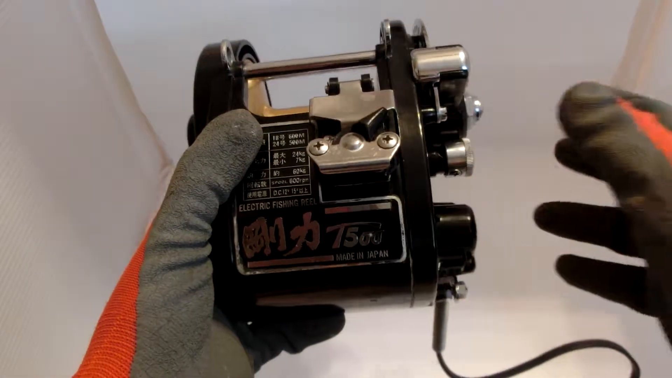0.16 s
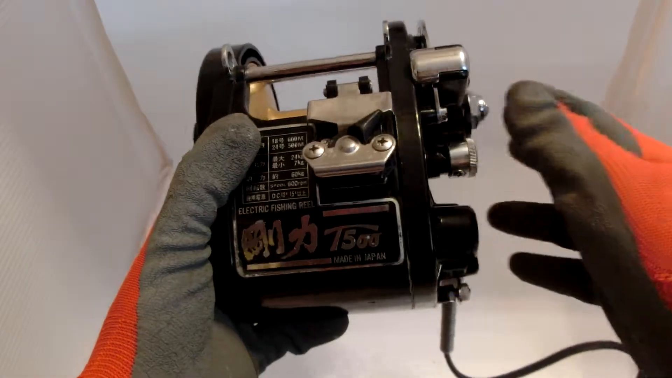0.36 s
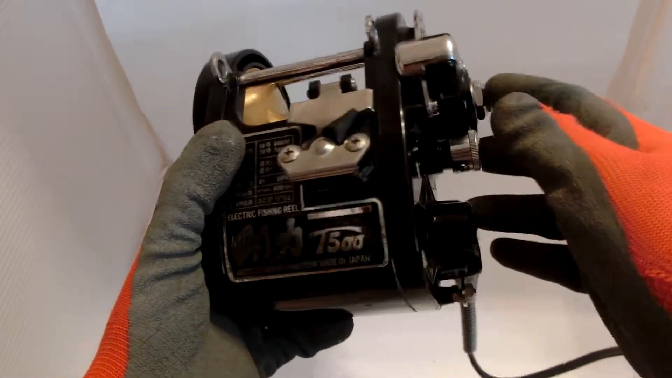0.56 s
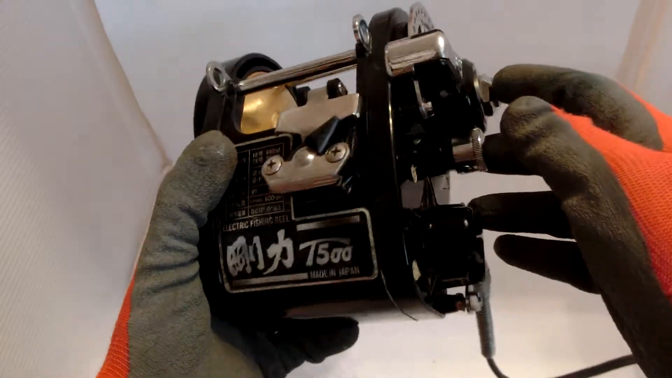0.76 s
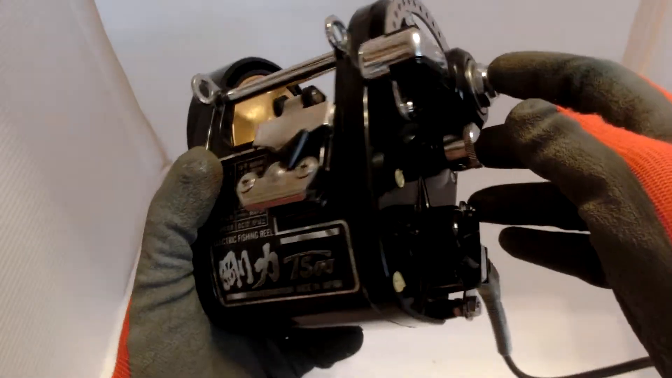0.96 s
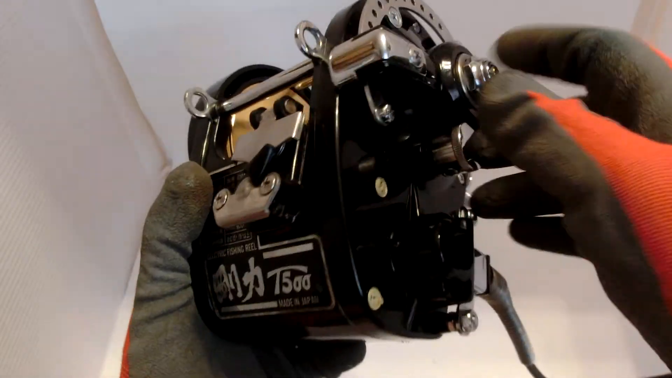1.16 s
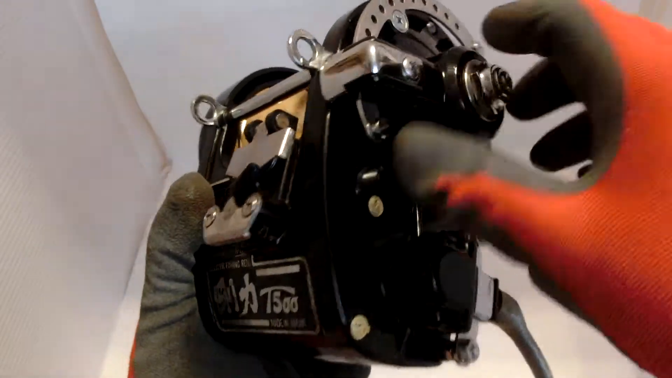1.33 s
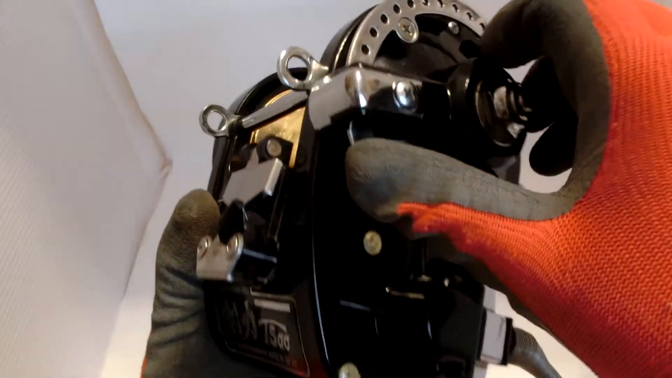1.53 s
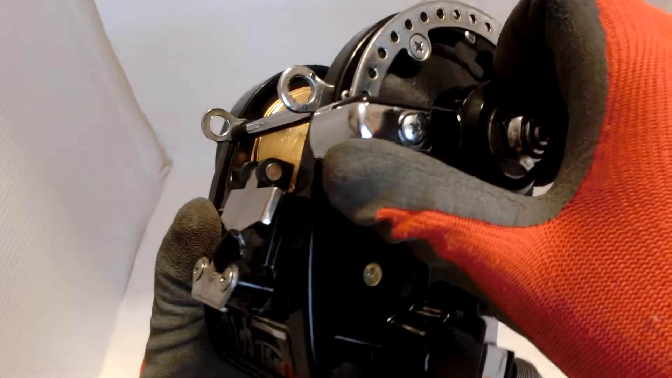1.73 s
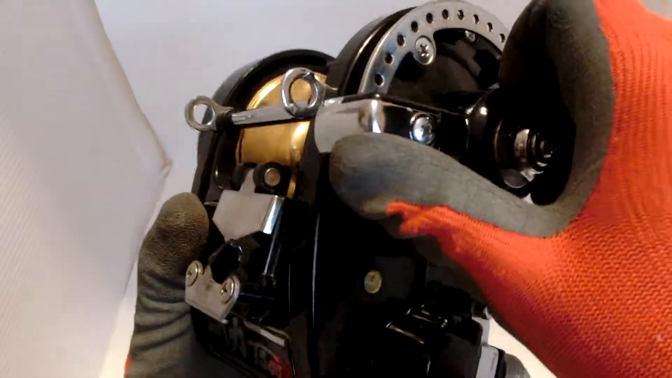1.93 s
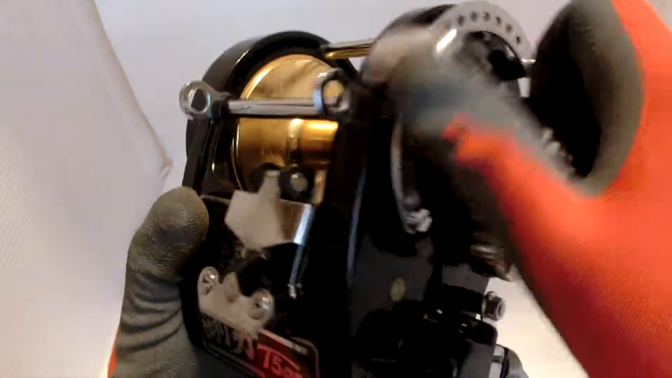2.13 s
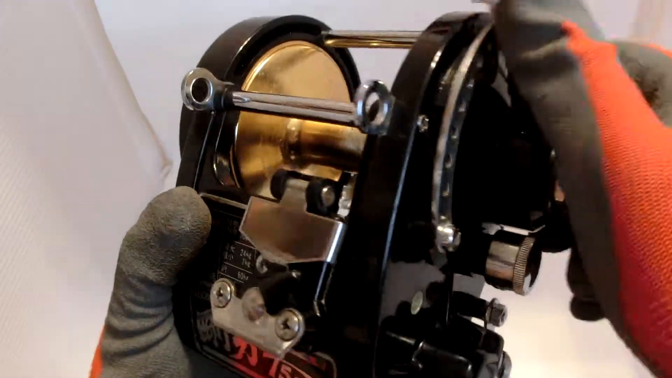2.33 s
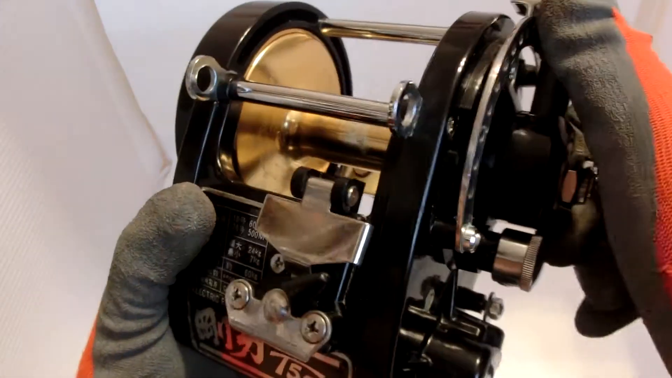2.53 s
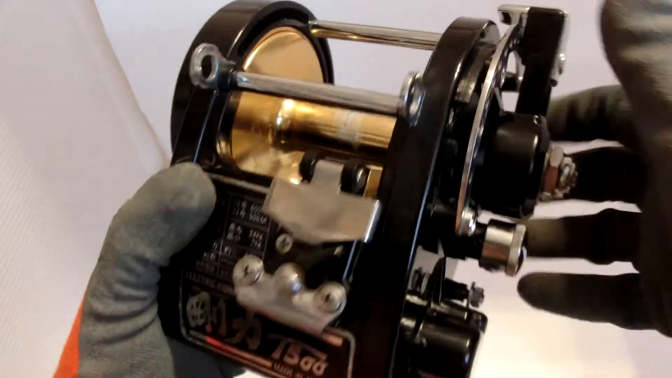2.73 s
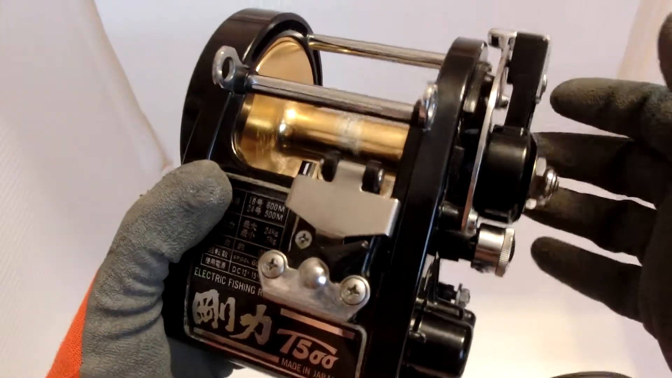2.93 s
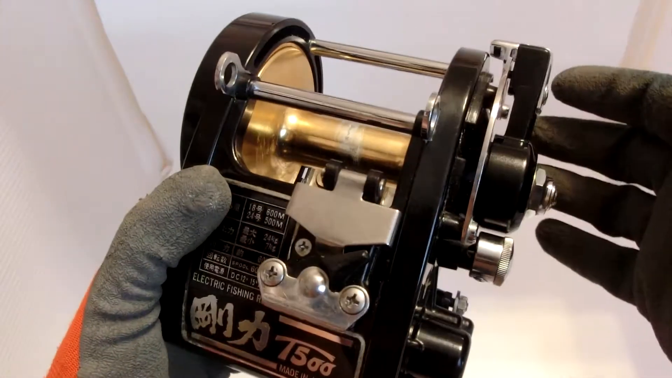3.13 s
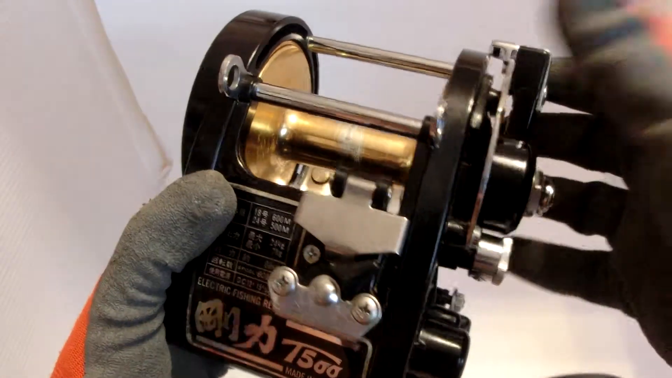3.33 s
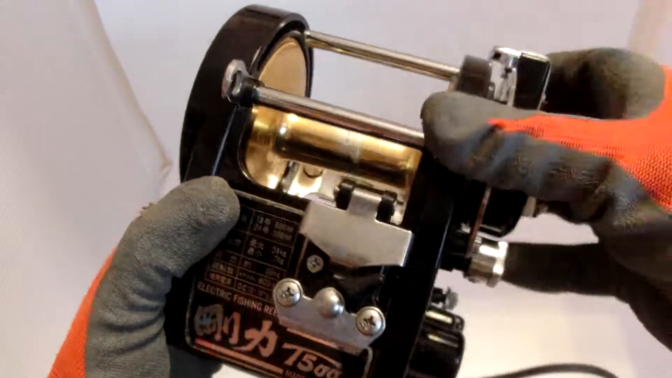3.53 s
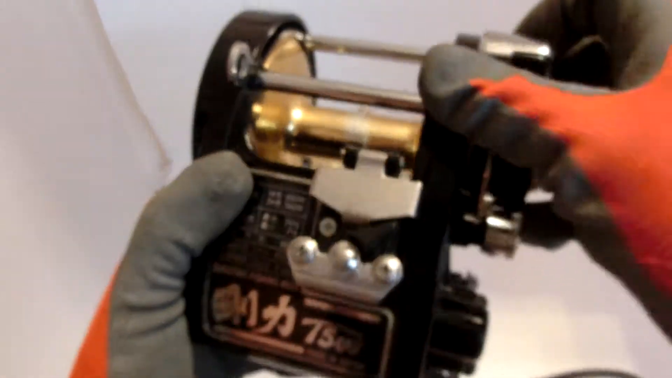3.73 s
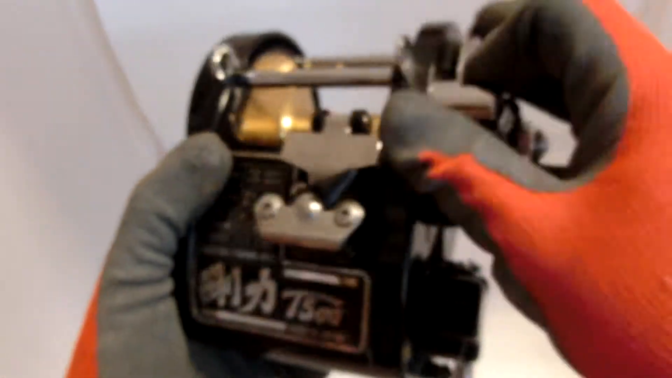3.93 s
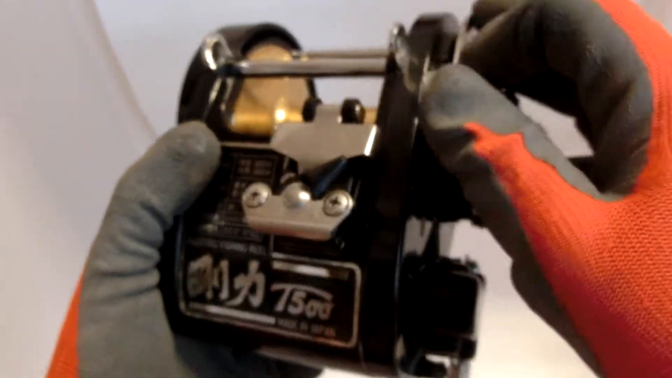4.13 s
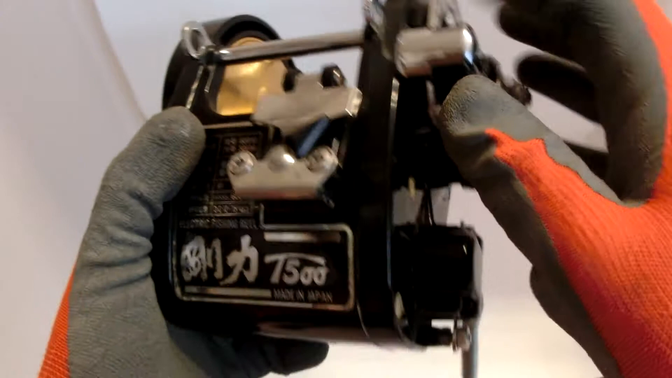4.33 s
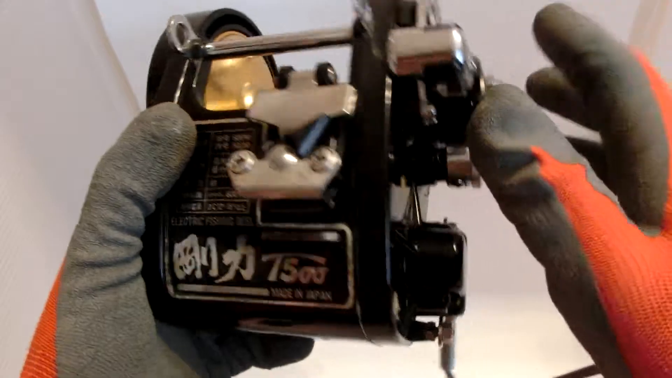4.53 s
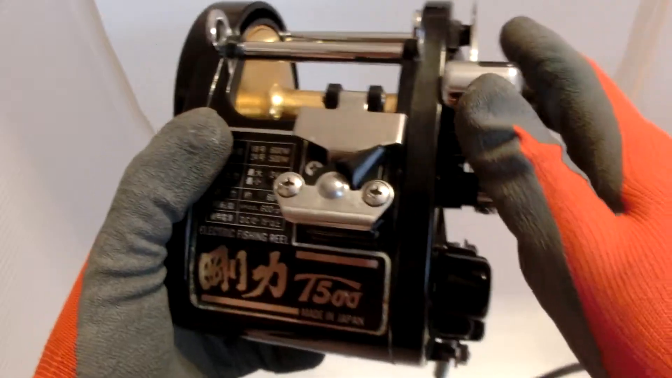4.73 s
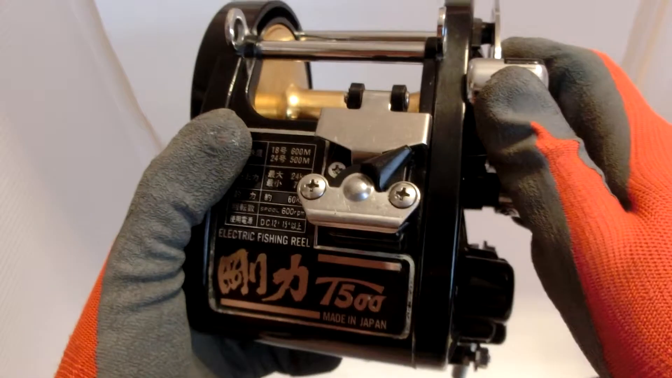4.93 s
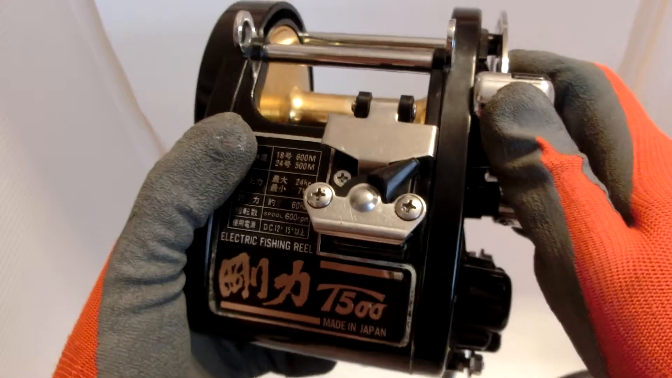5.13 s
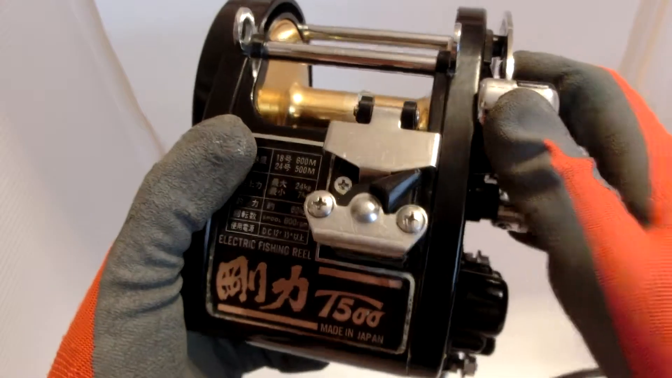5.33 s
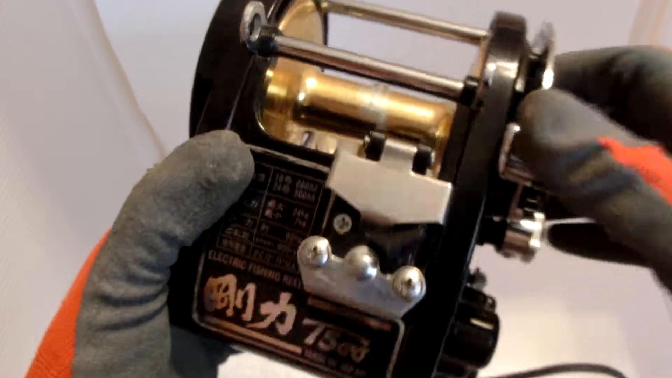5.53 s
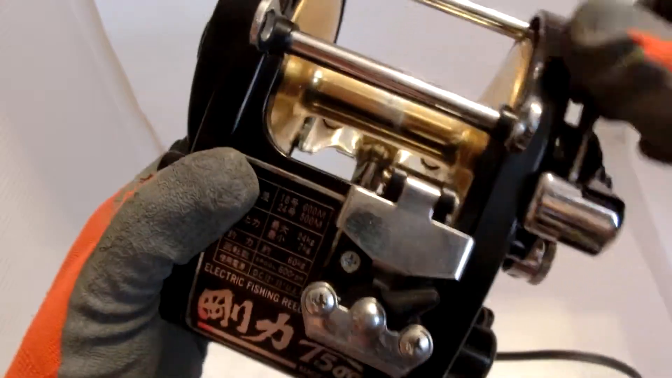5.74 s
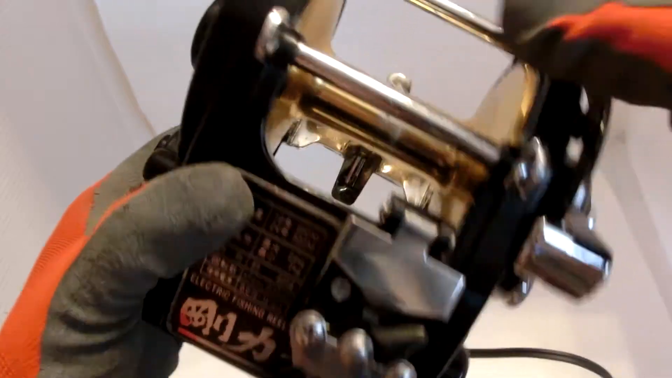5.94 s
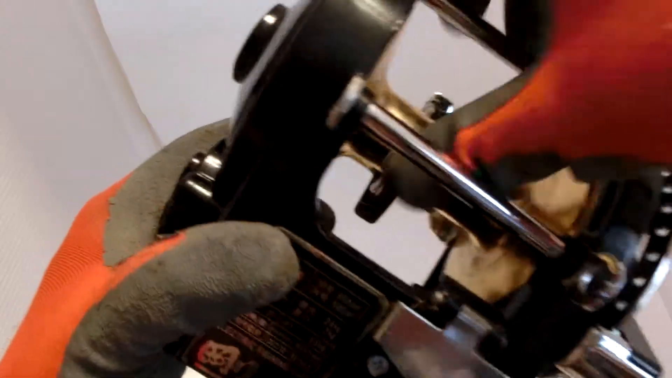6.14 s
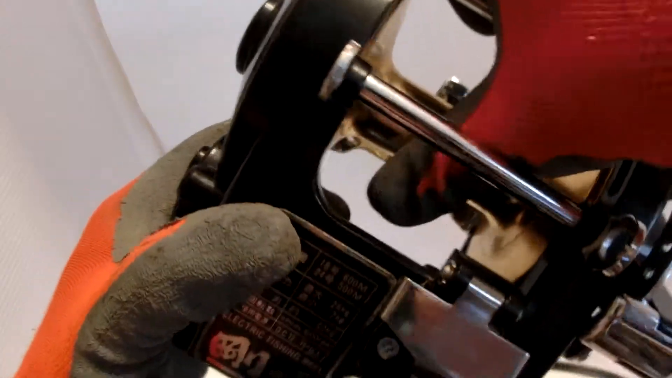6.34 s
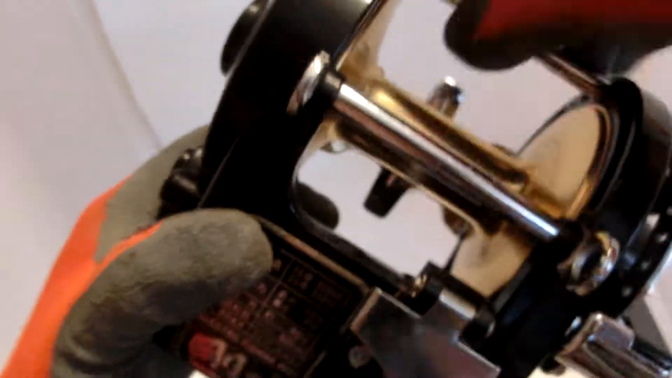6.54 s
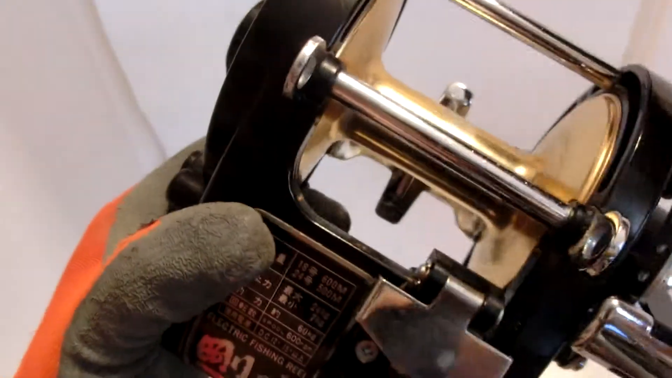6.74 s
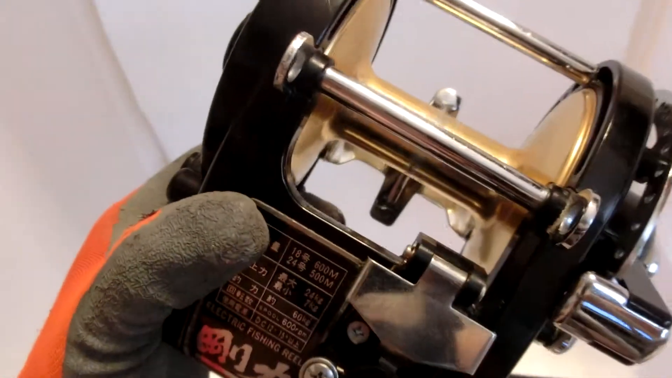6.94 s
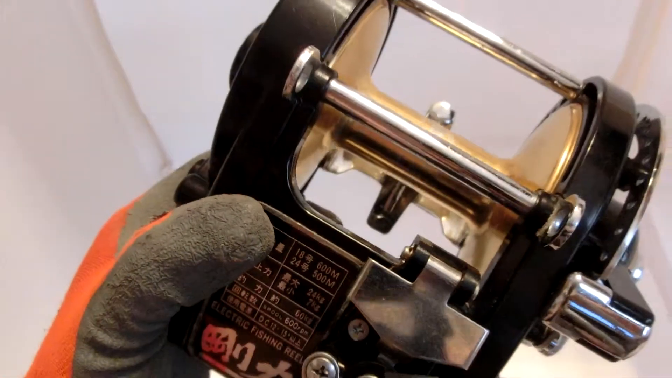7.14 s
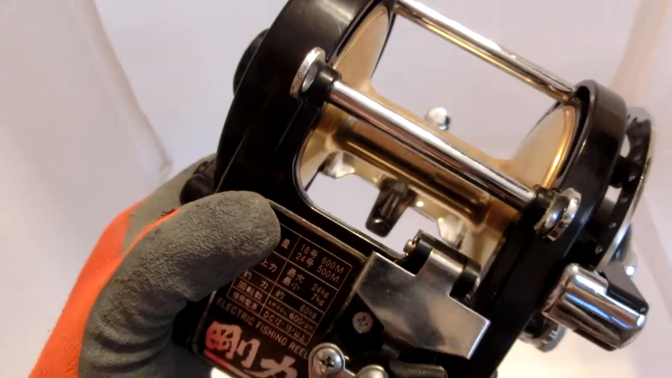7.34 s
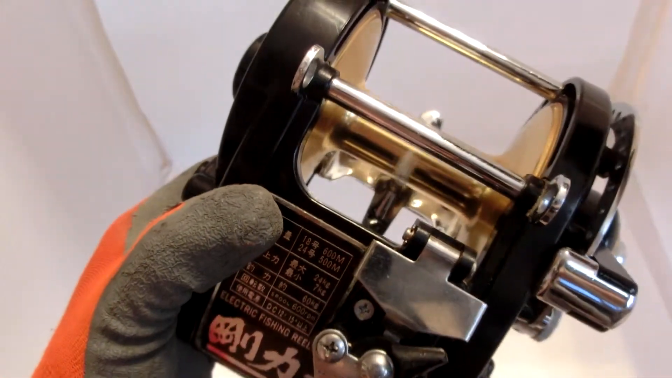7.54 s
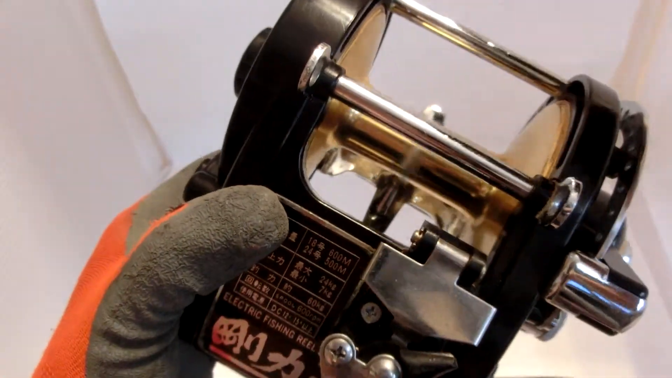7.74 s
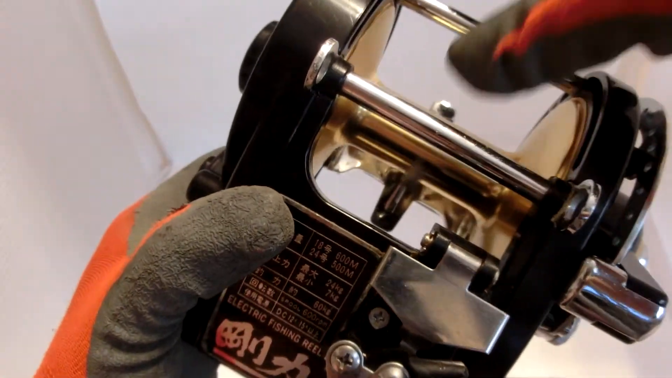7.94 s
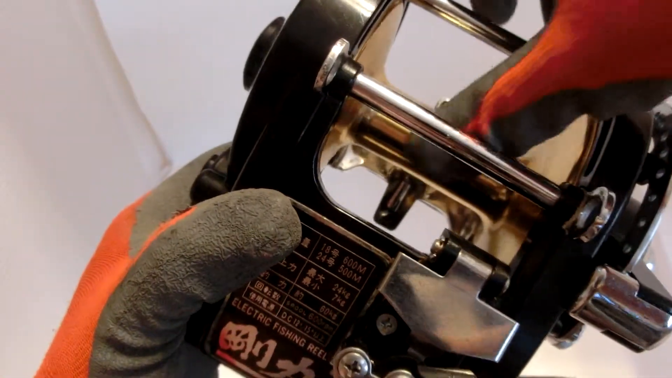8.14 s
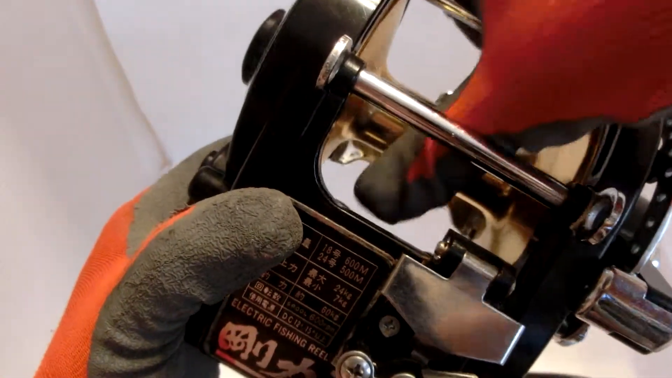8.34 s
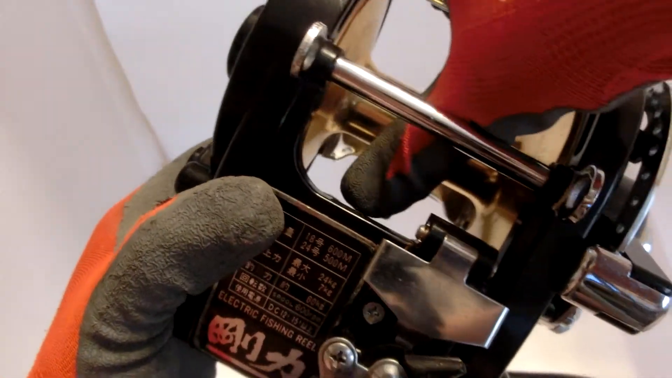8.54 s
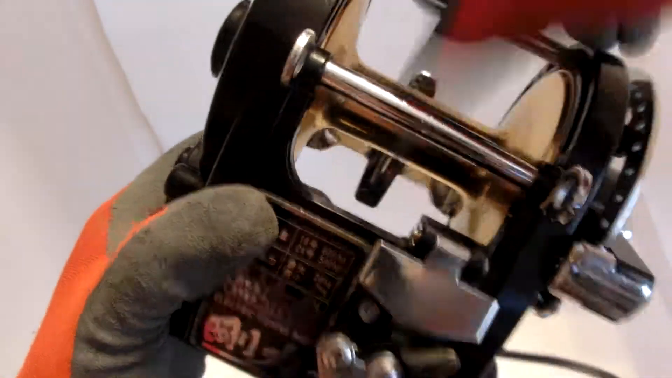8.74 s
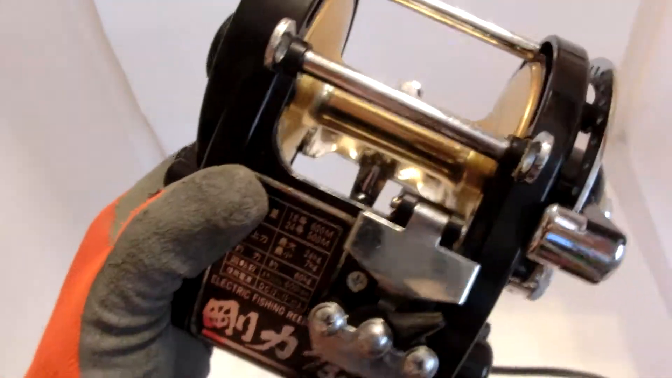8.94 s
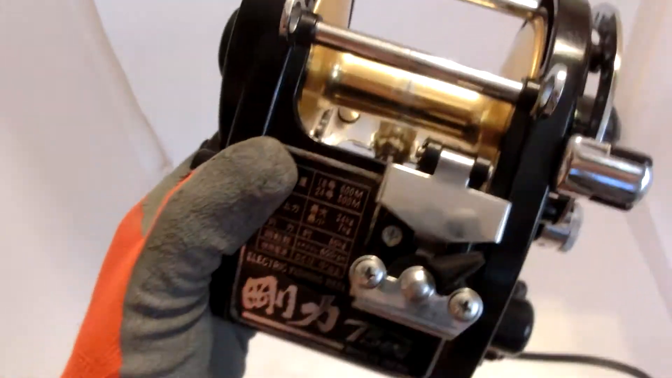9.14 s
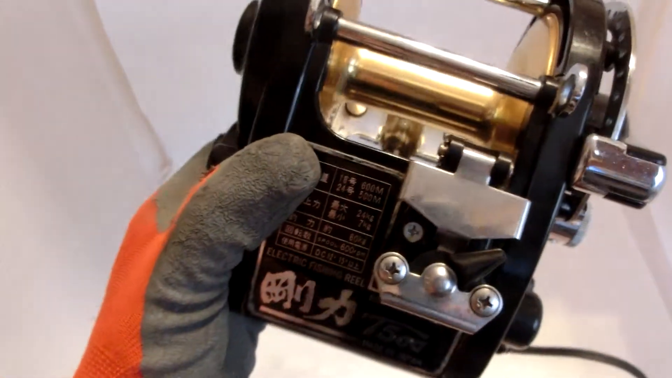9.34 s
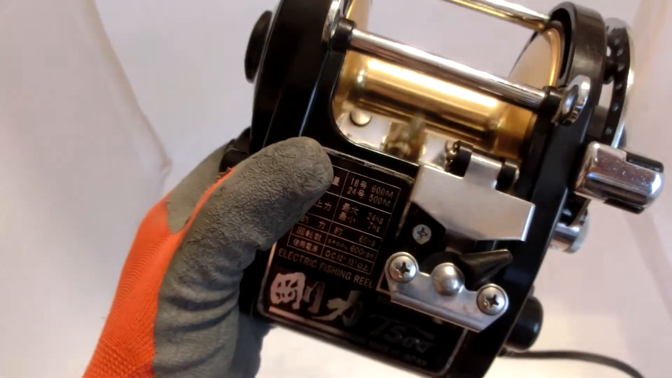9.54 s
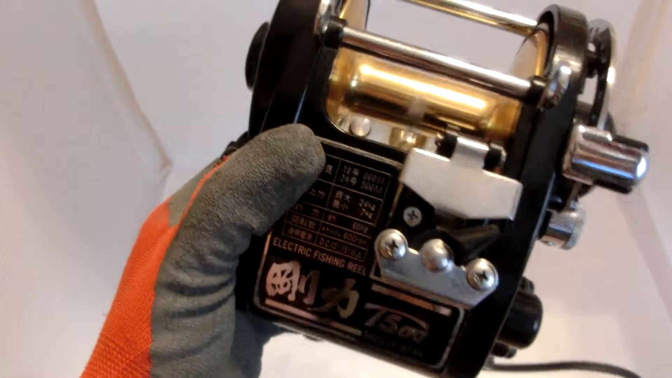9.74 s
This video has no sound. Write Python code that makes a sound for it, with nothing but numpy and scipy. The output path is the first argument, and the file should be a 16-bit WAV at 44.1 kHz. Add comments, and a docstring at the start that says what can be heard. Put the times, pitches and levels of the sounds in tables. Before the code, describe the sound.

Quiet indoor murmur and soft glove handling lead to a rapid metallic ratcheting, a pause, then another uneven burst with harder knocks. Later come small finger taps and a sharp snap with a low jolt, releasing a grainy, pulsing bearing whirr. It gradually slows, is braked amid taps, then a second snap restarts it. Close stereo pickup, short room reflections, gain dipping after loud clicks.

```python
"""A metal fishing reel in gloved hands close to a camera: its drag lever crosses the notches of a steel arc,
forward and back, each notch a bright tick and a duller knock that ring the side plate. Then a finger flicks
the free spool twice and it coasts on its ball bearings: noise through resonances, throbbing as it turns.
Gloves rub and tap as shaped noise, a far clock ticks through the small room's noise tails over murmur and
hiss, and the camera turns its gain down after loud clicks."""
import sys
import numpy as np
from scipy import signal
from scipy.fft import rfft, irfft, next_fast_len
from scipy.io import wavfile
from scipy.ndimage import uniform_filter1d, map_coordinates

SR = 44100
rng = np.random.default_rng(int(sys.argv[2]) if len(sys.argv) > 2 else 0)


def transcribe(u):
    """Save the signal u as a 16-bit wav file named by the first command-line argument.

    u: samples, shape (n,) or (channels, n), limited to [-1, 1]; the rate is SR.
    q: integer samples, one column per channel.
    """
    v = np.clip(np.atleast_2d(u).T, -1, 1)
    q = np.round(v * 32767).astype(np.int16)
    wavfile.write(sys.argv[1], SR, q)


def field_ratio(decibels):
    """Amplitude ratio for a level in dB (20 dB per decade); scalars and array-likes work."""
    return 10 ** (np.asarray(decibels, dtype=float) / 20)


N = 431298
TIME = np.arange(N) / SR

# Lever notches. Each row: tick time in seconds, plunger tick level in dB, wait for the seating knock in ms
# (from LEAD samples before the tick), knock level in dB, knock pitch in Hz.
NOTCHES = [(1.8672, -9.5, 2.5, -29.5, 1670), (2.05, -9, 4, -16, 2005), (2.0754, -11, 3.4, -20, 2040),
           (2.134, -7.5, 2.56, -21, 2500), (2.1696, -8, 2.9, -22.5, 5000), (2.2125, -11, 2.76, -10.5, 4100),
           (2.2523, -9.5, 3.9, -20.5, 2500), (2.3146, -11.5, 3.7, -22.5, 2400),
           (2.3700, -13.5, 1.15, -14, 5500), (2.4280, -18.5, 1.5, -32.5, 2800),
           (3.602, -13.5, 1.66, -6.5, 5000), (3.6142, -10.5, 1.44, -4.5, 3993), (3.632, -15, 1.8, -7, 2700),
           (3.6484, -12, 1.94, -4.5, 2500), (3.673, -15, 3.9, -14.5, 2500), (3.767, -19, 3.2, -6, 4020),
           (3.8014, -13.5, 3.1, -3.5, 4250), (3.8356, -12, 4, -5.5, 4130), (3.8810, -15.5, 2.9, -1, 4000)]
LEAD = 32  # samples
# Lever place along the arc. Each row: time in seconds, mean lag of the left port in microseconds.
LEVER_LAG_US = [(1.87, 28), (2.05, 21), (2.43, 13), (3.6, 13.5), (3.68, 25), (3.77, 27), (3.88, 22)]
# Modes of the side plate. Each row: frequency in Hz, relative level in dB, t60 in seconds.
PLATE_MODES = [(1010, -15.5, 0.2), (1654, -7, 0.087), (2200, -13.5, .1), (2515, -4, 0.12), (2976, -8, 0.1),
               (4200, -6.5, 0.17), (5000, -11.5, 0.082), (5500, -13, .12), (7760, -9.5, .12),
               (8680, -4.5, 0.14), (11260, -22.5, 0.13), (13920, -10.5, .1)]
# Colour of the plunger tick. Each row: frequency in Hz, relative level in dB per Hz.
TICK_COLOUR = [(880, -42), (1500, -15), (3320, -14.5), (6210, -5.5), (8570, 1), (9570, -0.5), (11500, -6.5),
               (13900, 2.5), (15200, -3.5), (16600, -29)]
# Broad resonances of the hollow body in every seating knock. Each row: frequency in Hz, relative level
# in dB per Hz.
BODY_COLOUR = [(100, -13.5), (400, -12.5), (1000, 3.5), (1700, 2), (2500, -0.5), (3400, -3), (4300, -0.5),
               (5300, 0.5), (6600, -6), (8600, 4.5), (11500, -4), (14000, -2.5), (16500, -19.5)]
TICK_T60_S, JOLT_UNDER_TICK_DB = 0.019, 27.5
STRIKE = 2.5  # single first impact of a contact over the rms of its chatter

# Spool releases. Each row: time in seconds, speed in turns/s, spool angle in turns, snap level in dB,
# lowest jolt pitch in Hz.
FLICKS = [(6.484, 8.58, 0.28, -14, 77), (8.712, 8.48, .596, -13.5, 63)]
# Spool and frame resonances. Each row: frequency in Hz, width in Hz (before widening 1.5 times), relative
# level in dB, then load in dB per unit of the once-a-turn throb, the twice-a-turn kick and the flutter.
SPOOL_MODES = [(438, 60, -10, 4.5, -4.5, 6), (741, 190, -7, 4, -0.5, 2), (1032, 163, -10, 5.5, 0.5, 5),
               (1596, 113, -5, 3, 1, 0.5), (2437, 49, -18, 1.5, -2, -17), (2653, 130, -10, 3, 4.5, 4.5),
               (3046, 300, -16.5, -4.5, 8, 7.5), (3168, 68, -6, 5.5, -0.5, 5.5),
               (3267, 50, -6.5, -4, 0.5, 4), (4250, 74, -8.5, -0.5, 1.5, 3.5),
               (4580, 120, -18, 5.5, -2, 7.5), (5930, 290, -10, -1.3, 7, 5.5), (7050, 45, -5.5, 1, 12, 0.5),
               (7418, 117, 1.5, -1, 4.5, 4), (10560, 100, -8, -5.5, -0.5, 6),
               (13870, 180, -4, -1, 3.5, 0.5)]
# Colour of the rolling hiss. Each row: frequency in Hz, relative level in dB per Hz.
ROLL_COLOUR = [(290, -34), (500, -8.5), (1100, -3), (2100, -11), (3160, -8.5), (6010, -4), (6560, -14.5),
               (7270, 3), (8540, -10), (11000, -7), (12500, -23), (14500, -11), (15800, -32),
               (16300, -60.5)]
SPOOL_LAG_US = 23  # left port lags, for spool and hands
PUSH_S, UP_TO_SPEED_S = 0.08, 0.077  # push starts before release; time to full speed
SLOWS_TURNS_PER_S2 = 3.025  # bearing drag
BRAKE_AT_S, BRAKE_S = 8.36, 0.077  # a finger stops the first run
WHIRR_DB, WHIRR_DB_PER_DECADE, REFERENCE_TURNS_PER_S = -46, 16.5, 8.1  # level at reference speed, slope

# Contacts of one flick. Each row: delay in ms, level over the snap in dB, pitch in Hz, t60 in seconds.
SNAP_CONTACTS = [(0, -1.5, 3490, .014), (2, -8.5, 896, 0.059), (10, -14.5, 1000, 0.034)]
# Shake of the held reel. Each row: delay in ms, level over the snap in dB, multiple of the lowest jolt
# pitch, t60 in seconds.
JOLT_MODES = [(-8, -12, 1, 0.091), (-3, -18, 2.47, 0.068), (-0.5, -19, 4.35, 0.054), (1, -21, 7.5, 0.039)]
# Small taps of fingers and fittings. Each row: time in seconds, level in dB, pitch in Hz, t60 in seconds.
TAPS = [(.06, -52, 798, 0.046), (.073, -43.5, 1060, .05), (.672, -58.5, 3500, .03),
        (1.7504, -43, 1000, .06), (2.471, -33.5, 2812, .019), (3.518, -49, 1474, .06),
        (4.63, -44.5, 2796, 0.12), (5.805, -50, 2200, 0.068), (6.466, -31, 4490, .012),
        (6.4747, -26, 3485, .018), (6.478, -26.5, 2700, .02), (6.579, -27, 3998, .011),
        (8.22, -36, 4100, 0.012), (8.248, -41.5, 4000, 0.012), (8.335, -44, 10000, .012),
        (8.351, -36.5, 3780, .025), (8.3845, -31.5, 3990, 0.011), (8.422, -36.5, 4195, 0.0115),
        (8.565, -50.5, 3494, .015), (8.686, -43, 870, 0.11), (8.698, -31.5, 2817, 0.061),
        (8.708, -30, 1098, .05), (8.724, -27.5, 1910, .03), (8.738, -37, 1000, .033),
        (9.291, -36, 7200, 0.018)]
BROAD_DB = -15.5  # broad clack under every tap
OVERTONE, OVERTONE_DB = 2.7, -8.5  # brighter band of every tap: multiple of its pitch, level
# Single-pitched pings of loose fittings. Each row: time in seconds, level in dB, pitch in Hz, t60 in seconds.
PINGS = [(1.208, -53, 11960, .03), (4.25, -46.5, 2630, .04), (4.545, -51.5, 938, 0.093),
         (5.138, -52, 11520, .025), (6.228, -57, 2700, .03), (7.188, -54, 12160, .024)]
PING_WIDTH = .2  # band width over pitch
# Strokes of the rubber glove. Each row: start in seconds, length in seconds, level in dB, pitch in Hz.
STROKES = [(1.099, 0.1, -63, 4490), (1.575, .08, -60, 7070), (2.023, .02, -37, 2200),
           (2.033, .03, -42, 8040), (2.613, 0.1, -53, 3910), (3.369, 0.1, -63, 4000),
           (3.57, .03, -38.5, 2200), (4.206, 0.11, -61, 2810), (5.53, .1, -62, 2500),
           (6.228, 0.09, -56.5, 5950), (6.359, 0.21, -47, 5000), (6.561, .035, -45, 3994),
           (8.297, .14, -58.5, 8090), (8.462, .1, -61, 5990), (8.584, 0.15, -44.5, 8470),
           (8.655, 0.11, -46.5, 4020)]

# Near sounds at the two ports. Each row: frequency in Hz, left over right in dB.
LEFT_OVER_RIGHT_DB = [(60, 0.5), (300, 4), (1650, 0.4), (6000, 0.8), (10000, 1.5), (15000, -1.5)]
# Room tail. Each row: frequency in Hz, t60 in seconds, nearest surfaces over the tail in dB,
# left-right likeness from 0 to 1.
ROOM_BANDS = [(300, 0.13, 3.5, 0.61), (1000, 0.31, 16, 1), (2500, 0.45, 4, 0.97), (4300, 0.3, 4.5, 0.75),
              (6500, 0.3, 4.5, .3), (9000, 0.29, 5.5, .1), (15120, 0.16, 8, .05)]
# Clock. The row: first tick in seconds, period in seconds.
CLOCK_TIMES_S = (.893, .9975)
CLOCK_DB = -54
# Colour of room and camera noise. Each row: frequency in Hz, relative level in dB per Hz.
AIR_COLOUR = [(12, -28.5), (20, 1), (48, -3), (118, -5), (190, -12.5), (363, -9), (494, -11.5), (760, -13),
              (900, -18), (1290, -22.5), (3080, -27), (6000, -29.5), (14100, -31), (15800, -36),
              (16300, -59)]
# Noise at the two ports. Each row: frequency in Hz, left-right likeness.
AIR_LIKENESS = [(60, 0.67), (150, 0.44), (380, 0.78), (950, 0.64), (2380, 0.2), (5980, 0.05),
                (15000, -0.01)]
AIR_DB = -57.5
# Thin tone that comes and goes. Each row: start in seconds, end in seconds.
WHINE_SPANS_S = [(.1, .72), (2.55, 2.9), (3.1, 3.5), (5.3, 5.7)]
WHINE_HZ, WHINE_DB = 3740, -78.5


def unit(x):
    """Scaled to rms 1."""
    return x / np.sqrt(np.mean(x ** 2) + 1e-20)


def along(points, hz, axis=1):
    """One column of (Hz, ..) rows read on a log axis."""
    columns = np.transpose(points)
    return np.interp(np.log(hz + 1), np.log(columns[0] + 1), columns[axis])


def filtered(x, response):
    """x times a complex response of frequency."""
    m = next_fast_len(x.shape[-1] + 4096)
    return irfft(rfft(x, m) * response(np.fft.rfftfreq(m, 1 / SR)), m)[..., :x.shape[-1]]


def peak(hz, width_hz):
    """One causal resonance."""
    return lambda f: 1j * f * width_hz / (hz * hz - f * f + 1j * f * width_hz)


def wobble(rate_hz, size):
    """A smooth random curve, rate_hz knots a second."""
    return map_coordinates(rng.standard_normal(size // 100), [np.arange(size) * rate_hz / SR])


def add(track, s, sound):
    """Mixes a sound into a track at s seconds."""
    part = track[..., round(s * SR):][..., :sound.shape[-1]]
    part += sound[..., :part.shape[-1]]


def blow(colour, t60, rise_s, ring_db):
    """A chattering metal contact: a dying noise burst, and the plate modes that its colour reaches.
    Loose parts make each mode waver in phase."""
    t = np.arange(SR // 4) / SR
    impact = STRIKE * (np.arange(len(t)) == round(rise_s * SR))
    burst = unit(filtered(rng.standard_normal(len(t)) + impact, colour))
    burst = burst * (.7 * field_ratio(-60 * t / t60) + .6 * field_ratio(-240 * t / t60))  # the first touch is the hardest
    hz, db, ring_t60 = np.transpose(PLATE_MODES)[:, :, None]
    shape = (len(PLATE_MODES), len(t))
    waver = np.cumsum(rng.standard_normal(shape), 1) * np.sqrt(hz / SR) * .35
    level_db = db + ring_db + 2 * rng.standard_normal((len(PLATE_MODES), 1)) - 60 * t / ring_t60
    modes = abs(colour(hz)) * field_ratio(level_db) * np.sin(2 * np.pi * hz * t + waver)
    return (burst + modes.sum(0)) * (1 - np.exp(-t / rise_s))


def lever():
    """At each notch the spring plunger slips off the edge with a bright tick and a small jolt of the whole
    reel, then seats with a duller knock. Returns the dry clicks and what the two ports hear."""
    track, pair = np.zeros(N), np.zeros((2, N))
    bright = lambda f: field_ratio(along(TICK_COLOUR, f))
    for s, tick_db, wait_ms, knock_db, hz in NOTCHES:
        dull = lambda f: field_ratio(along(BODY_COLOUR, f)) * (abs(peak(hz, .35 * hz)(f)) + 0.12)
        tick = field_ratio(tick_db) * blow(bright, TICK_T60_S, .00015, ring_db=-28)
        jolt = field_ratio(tick_db - JOLT_UNDER_TICK_DB) * blow(peak(550, 1000), 0.094, 0.0016, ring_db=-30.5)
        knock = field_ratio(knock_db) * blow(dull, .028, 0.0011, ring_db=-15)
        click = np.pad(tick, (LEAD, 0))  # room for the port that hears it early
        add(click, 0, jolt)
        add(click, wait_ms / 1000, knock)
        lag_us = np.interp(s, *np.transpose(LEVER_LAG_US)) + 4 * rng.standard_normal()
        add(track, s - LEAD / SR, click)
        add(pair, s - LEAD / SR, ports(click, lag_us))
    return track, pair


def rotation(t):
    """Speed (turns/s) and angle (turns): pushed up to speed, let go, slowed evenly by drag, once braked."""
    speed, turns = np.zeros(len(t)), np.zeros(len(t))
    for s, top, angle, _, _ in FLICKS:
        run = top - SLOWS_TURNS_PER_S2 * np.maximum(t - s, 0)
        run = run * np.clip((t - s + PUSH_S) / UP_TO_SPEED_S, 0, 1)
        if s < BRAKE_AT_S:
            run = run * np.clip(1 - (t - BRAKE_AT_S) / BRAKE_S, 0, 1)
        run = np.maximum(run, 0)
        swept = np.cumsum(run) / SR
        speed = speed + run
        turns = np.where(t > s - PUSH_S, angle + swept - np.interp(s, t, swept), turns)
    return speed, turns


def spool():
    """Balls rolling on rough races feed each resonance with noise. The unbalanced spool loads them once a
    turn, and twice a turn something catches and kicks the treble."""
    t = TIME[6 * SR:]
    speed, turns = rotation(t)
    throb = 1.04 * np.cos(2 * np.pi * (turns - .2)) + 0.38 * np.cos(4 * np.pi * (turns - .2))
    since = np.minimum(turns % 1, (turns - .47) % 1) * 2  # half turns since the last catch
    kick = np.exp(-since / .22) * (1 - np.exp(-since / .03)) * (2.1 + .25 * wobble(16, len(t)))
    rattle = wobble(90, len(t))  # the ball cage chatters
    grit = lambda: rng.standard_normal(len(t))
    hiss = unit(filtered(grit(), lambda f: field_ratio(along(ROLL_COLOUR, f))))
    hiss = field_ratio(-7 + 0.77 * throb + 4.2 * kick + rattle) * hiss
    rings = 0
    for hz, width_hz, db, throb_db, kick_db, flutter_db in SPOOL_MODES:
        flutter = np.tanh(.7 * rattle + .7 * wobble(55, len(t)))
        load_db = throb_db * throb + kick_db * kick + flutter_db * flutter
        rings = rings + field_ratio(db) * filtered(field_ratio(load_db) * grit(), lambda f: peak(hz, 1.5 * width_hz)(f) ** 2)
    level_db = WHIRR_DB + WHIRR_DB_PER_DECADE * np.log10(speed / REFERENCE_TURNS_PER_S + 1e-4)
    return np.pad(field_ratio(level_db) * unit(hiss + unit(rings)), (N - len(t), 0))


def taps():
    """Finger taps and flick snaps: contacts with a main band, an overtone band and a broad clack."""
    track = np.zeros(N)
    snaps = [(s + ms / 1000, db + over_db, hz, t60)
             for s, _, _, db, _ in FLICKS for ms, over_db, hz, t60 in SNAP_CONTACTS]
    for s, db, hz, t60 in TAPS + snaps:
        main, over = peak(hz, 1.1 * hz), peak(OVERTONE * hz, 1.1 * OVERTONE * hz)
        clack = peak(1800, 9000)
        colour = lambda f: main(f) ** 2 + field_ratio(OVERTONE_DB) * over(f) ** 2 + field_ratio(BROAD_DB) * clack(f)
        add(track, s, field_ratio(db) * blow(colour, t60, 0.0003, ring_db=-23))
    return track


def pings():
    """Loose fittings struck: contacts through one narrow resonance."""
    track = np.zeros(N)
    for s, db, hz, t60 in PINGS:
        colour = lambda f: peak(hz, PING_WIDTH * hz)(f) ** 2
        add(track, s, field_ratio(db) * blow(colour, t60, 0.0008, ring_db=-30))
    return track


def strokes():
    """Rubber sticks and slips: noise of jittering level through one broad resonance."""
    track = np.zeros(N)
    for s, length_s, db, hz in STROKES:
        size = round(length_s * SR)
        slips = rng.standard_normal(size) * field_ratio(2 * wobble(300, size))
        rub = unit(filtered(slips, lambda f: peak(hz, 2.6 * hz)(f) ** 2))
        add(track, s, field_ratio(db) * np.hanning(size) * rub)
    return track


def flick_jolts():
    """The held reel shakes at each flick: low damped sines."""
    track, t = np.zeros(N), np.arange(SR // 3) / SR
    for s, _, _, db, hz in FLICKS:
        for ms, over_db, multiple, t60 in JOLT_MODES:
            envelope = field_ratio(db + over_db - 60 * t / t60) * (1 - np.exp(-t / 0.0012))
            add(track, s + ms / 1000, envelope * np.sin(2 * np.pi * multiple * hz * t))
    return track


def hands():
    """Everything the gloved hands do apart from the lever, as one near track."""
    return taps() + pings() + strokes() + flick_jolts()


def ports(x, lag_us):
    """The two microphone ports hear a near source at slightly different strength and time."""
    half = lambda f: field_ratio(along(LEFT_OVER_RIGHT_DB, f) / 2) * np.exp(-1j * np.pi * f * lag_us / 10 ** 6)
    return filtered(x, lambda f: np.array([half(f), 1 / half(f)]))


def room(x):
    """A quick answer from the nearest surfaces, then a tail that dies by band; every .3 s meets a new tail."""
    out, step = np.zeros((2, N + SR)), SR * 3 // 10
    for start in range(0, N, step):
        hz, t, z = signal.stft(rng.standard_normal((2, SR // 3)), SR, nperseg=128)
        t60, early_db, alike = (along(ROOM_BANDS, hz, axis=k)[:, None] for k in (1, 2, 3))
        turn = np.arccos(np.clip(alike, -1, 1)) / 2
        decay = field_ratio(-60 * t / t60) + field_ratio(early_db - 60 * t / .04)
        mid, side = z * decay * [np.cos(turn), np.sin(turn)]
        tail = signal.istft(np.array([mid + side, mid - side]), SR, nperseg=128)[1]
        wet = signal.fftconvolve(x[None, start:start + step], tail / np.linalg.norm(tail[0]), axes=1)
        out[:, start + 60:][:, :wet.shape[1]] += wet
    return out[:, :N]


def clock():
    """About once a second, a dying noise burst through three resonances; sent only to the room."""
    track, t = np.zeros(N), np.arange(SR // 10) / SR
    colour = lambda f: peak(3600, 900)(f) - .6 * peak(5500, 1500)(f) + 0.32 * peak(7500, 3000)(f)
    first_s, period_s = CLOCK_TIMES_S
    for s in np.arange(first_s, N / SR, period_s):
        tick = unit(filtered(rng.standard_normal(len(t)), colour))
        add(track, s, field_ratio(CLOCK_DB - 60 * t / .15) * tick)
    return track


def whine():
    """A thin, slightly unsteady sine, faded in and out over its spans."""
    tone = field_ratio(WHINE_DB + 3 * wobble(12, N)) * np.sin(2 * np.pi * WHINE_HZ * TIME + wobble(20, N))
    gate = sum((a < TIME) & (TIME < b) for a, b in WHINE_SPANS_S) * 1.
    return tone * uniform_filter1d(gate, size=2000)


def air():
    """Low room murmur, more alike at both ports than the camera's hiss: noise mixed as mid and side."""
    turn = lambda f: np.arccos(np.clip(along(AIR_LIKENESS, f), -1, 1)) / 2
    spread = lambda f: np.array([np.ones_like(f), np.tan(turn(f))])
    mid, side = filtered(rng.standard_normal((2, N)), lambda f: field_ratio(along(AIR_COLOUR, f)) * spread(f))
    return field_ratio(AIR_DB) * np.array([mid + side, mid - side]) / np.std(mid)


def scene():
    """Reel and hands near the camera, the room behind them."""
    clicks, click_pair = lever()
    near = spool() + hands()
    direct = click_pair + ports(near, SPOOL_LAG_US)
    return direct + room(field_ratio(-8.5) * (clicks + near) + clock()) + air() + whine()


def gain_control(x, knee_db, slope, hold_s, back_db_per_s):
    """Gain drops as the running level passes the knee and climbs back at a steady pace."""
    size = round(hold_s * SR)
    power = uniform_filter1d((x ** 2).mean(0), size, origin=size // 2 - 1)  # looks back in time
    level_db = 10 * np.log10(abs(power) + 1e-12)
    cut_db = slope * np.maximum(level_db - knee_db, 0)
    cut_db = np.maximum.accumulate(cut_db + back_db_per_s * TIME) - back_db_per_s * TIME
    return x * field_ratio(-cut_db)


def roll_off(x):
    """The treble ends steeply here."""
    return signal.sosfilt(signal.butter(12, 16800, fs=SR, output="sos"), x)


def record(dry):
    """The camera's gain control and what follows it."""
    mix = gain_control(dry, knee_db=-28.5, slope=0.82, hold_s=0.59, back_db_per_s=3.0)
    return roll_off(mix)


dry = scene()
out = record(dry)
transcribe(out)
```